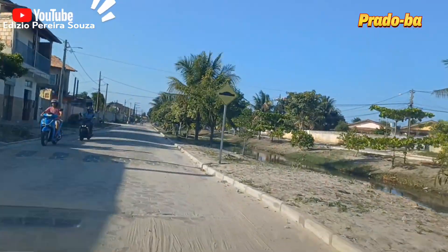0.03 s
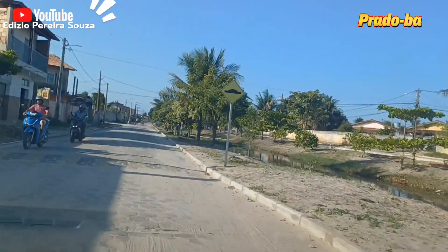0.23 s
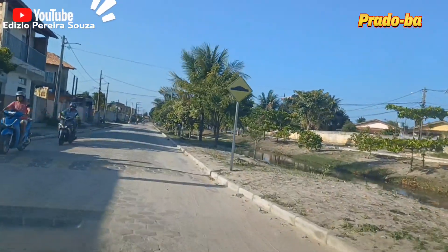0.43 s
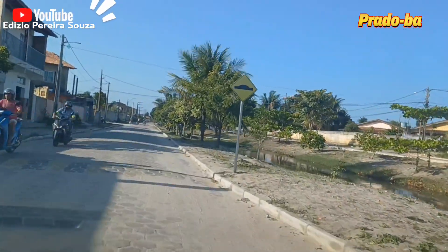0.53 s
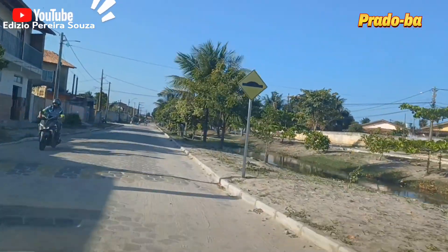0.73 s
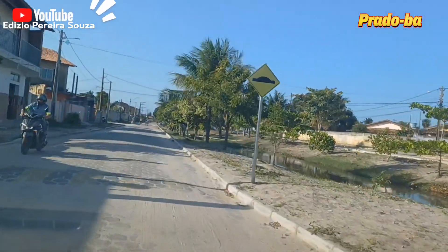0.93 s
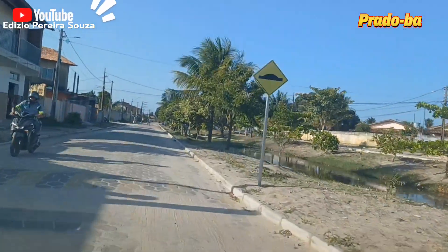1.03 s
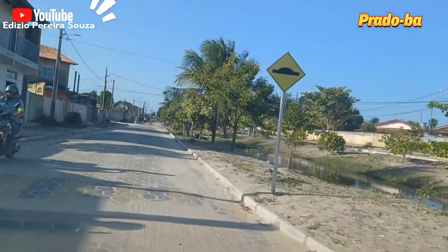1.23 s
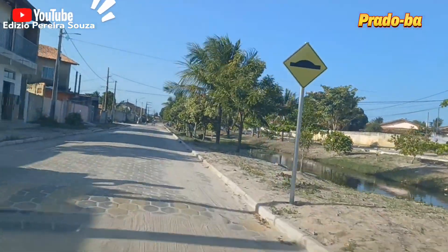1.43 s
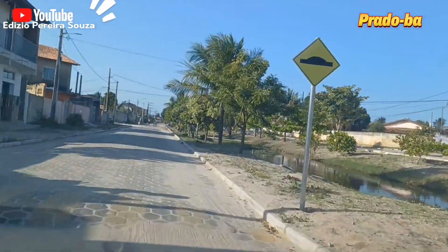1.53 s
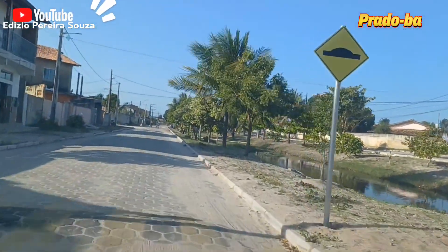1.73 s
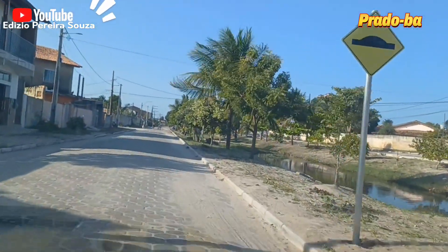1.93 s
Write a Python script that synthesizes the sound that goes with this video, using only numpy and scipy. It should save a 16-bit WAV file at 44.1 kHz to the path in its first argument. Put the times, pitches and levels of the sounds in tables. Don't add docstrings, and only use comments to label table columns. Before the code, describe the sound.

A car rolls over rough paving blocks, heard from inside as deep uneven rumbling and booming bumps.

```python
import sys
import numpy as np
from scipy import signal
from scipy.fft import rfft, irfft, next_fast_len
from scipy.io import wavfile
from scipy.ndimage import uniform_filter1d, map_coordinates

SR = 44100
rng = np.random.default_rng(int(sys.argv[2]) if len(sys.argv) > 2 else 0)


def waveform_to_disk(signal):
    frames = np.transpose(np.atleast_2d(signal))
    scaled = np.clip(frames, -1, 1) * 32767
    samples = np.round(scaled).astype(np.int16)
    wavfile.write(sys.argv[1], SR, samples)


def gain_from_db(level_db):
    decades = np.asarray(level_db, float) / 20
    return 10 ** decades


N = 88200

# start_s, roughness_db, tyre_roar_db
ROAD_SURFACE = [(0, -37, -50.5), (.17, -41, -49), (.42, -38, -50.5), (.68, -42, -52.5), (.78, -39.5, -49),
                (.93, -40.5, -54), (1.0, -36.5, -47), (1.2, -41.5, -52), (1.33, -35.5, -51),
                (1.42, -33, -52), (1.52, -35.5, -47.5), (1.57, -38, -57.5), (1.63, -37.5, -45),
                (1.7, -36, -51.5), (1.8, -40, -51.5), (2, -36.5, -50.5)]
# pitch_hz, width_hz, level_db
CABIN_MODES = [(34, 12.2, -3.5), (47.6, 12.3, -5), (76.6, 40, -7), (106.2, 20, -1.5), (137.1, 40.2, -2),
               (167.1, 57.6, -6.5)]
# pitch_hz, width_hz, level_db
FLOOR_MODES = [(181.4, 32.7, -1.5), (245, 29, 0.5), (282.4, 41, -3), (361.7, 70.4, -5), (429, 104, -8.5)]
# pitch_hz, level_db (per Hz)
TYRE_TONE = [(260, -34.5), (450, -8), (580, -1.5), (653, -4), (766, -5), (941, -13.5), (1780, -22.5),
             (2030, -28), (3000, -42.5), (3900, -72.5), (6600, -120)]
# start_s (the crest), pitch_hz, level_db (peak), left_lean (-1 to 1)
BUMPS = [(0.0125, 120.6, -17.5, -0.18), (.04, 68, -26, .08), (.08, 142, -24.5, .21),
         (0.087, 100.2, -20.5, -0.26), (0.168, 111.7, -21.5, 0.02), (0.223, 95.4, -22, -0.02),
         (0.223, 47, -19.5, -0.07), (.288, 123.4, -23.5, 0), (0.354, 82.5, -24, 0.12),
         (.372, 137, -23, -.07), (.384, 39.6, -27, -.06), (.408, 117.3, -24, -.31),
         (.432, 155.5, -26.5, .02), (.476, 144.7, -27, -.04), (0.496, 94.2, -21, -0.02),
         (0.566, 88, -21, 0.16), (0.569, 47.7, -20.5, -0.04), (.636, 51, -27, -.05),
         (.692, 46.7, -26.5, -.1), (.712, 84.4, -26.5, .14), (.788, 39, -25.5, -.06),
         (0.789, 86.8, -19.5, -0.02), (.836, 141.8, -25.5, .18), (.868, 72, -25.5, -.13),
         (0.951, 90, -21, -0.17), (0.981, 46.2, -20.8, -0.08), (1.028, 100.4, -26.5, -.06),
         (1.083, 53, -19, -0.06), (1.136, 85, -26.5, .08), (1.136, 123, -27.5, .12),
         (1.184, 47.4, -24.5, -.04), (1.219, 88.2, -24, 0.09), (1.28, 45.5, -25, -0.05),
         (1.287, 138.2, -22, 0.28), (1.356, 96.6, -21, -.24), (1.434, 164.4, -25.5, -0.3),
         (1.4335, 134.6, -17, 0.04), (1.454, 109.4, -16, -0.11), (1.495, 52.5, -20.5, -0.06),
         (1.551, 86.5, -18, 0.12), (1.608, 137.4, -26.5, .23), (1.632, 91.4, -22, .24),
         (1.681, 44.4, -24, -0.09), (1.716, 76, -24.5, 0), (1.724, 114, -26.5, -.09),
         (1.768, 60, -24.5, -.09), (1.8, 85.5, -24.5, 0.1), (1.852, 138.5, -26.5, .04),
         (1.975, 114.6, -23.5, -0.32)]
# start_s (the crest), pitch_hz, level_db (peak)
MORE_BUMPS = [(.012, 40, -36), (.013, 154.5, -26.5), (.013, 210, -35), (.13, 42, -30), (.65, 75.2, -34),
              (.73, 122, -26.5), (.85, 110.7, -30), (1.15, 81, -29.5), (1.25, 104.3, -26.5),
              (1.407, 109.5, -20), (1.27, 298, -40.5), (1.66, 150, -28.5), (1.85, 75.5, -26.5),
              (1.885, 101, -29.5), (1.991, 86, -26), (.112, 335, -42.5), (.132, 260, -37),
              (.164, 562, -51), (.184, 181.5, -34.5), (.184, 639, -54), (.264, 523, -48),
              (.316, 357, -43.5), (.372, 271, -39), (.404, 365, -43.5), (.44, 215, -33.5),
              (.548, 593, -51), (.632, 520, -53.5), (.7, 204, -37.5), (.736, 389, -46),
              (.768, 583, -52.5), (.808, 213, -37), (.824, 293, -44), (.956, 574, -47.5),
              (.976, 233.3, -40), (1.004, 346, -40.5), (1.068, 176, -34.5), (1.18, 663, -54.5),
              (1.36, 266, -35.5), (1.38, 363, -45.5), (1.42, 216, -31), (1.436, 482, -44.5),
              (1.44, 354, -42.5), (1.464, 275, -36), (1.504, 395, -43), (1.508, 576, -49.5),
              (1.512, 235, -31.5), (1.62, 277, -33.5), (1.632, 655, -50), (1.732, 311, -40.5),
              (1.732, 386, -38), (1.764, 235, -37.5), (1.828, 317, -41), (1.9, 247.5, -37),
              (1.94, 195, -36), (1.96, 304, -36.5), (1.984, 175, -32.5)]
# start_s, level_db (peak)
TRIM_RATTLES = [
    (.222, -58.5),
    (.745, -58),
    (1.046, -49.5),
    (1.103, -50),
    (1.172, -53.5),
    (1.612, -60),
]
# pitch_hz, width_hz, level_db
TRIM_MODES = [(1050, 120, -7), (1280, 120, -6), (1522, 80, -1), (1735, 110, -2), (2700, 600, -22),
              (4850, 150, -21)]
# start_s, pitch_hz, width_hz, level_db (peak)
SMALL_TICKS = [(.094, 12000, 3000, -55), (.398, 11500, 5960, -53), (.549, 11100, 3000, -57),
               (.81, 9000, 4000, -66), (.833, 8900, 4000, -63), (1.265, 6550, 595, -61),
               (1.449, 10600, 400, -68), (1.462, 13000, 6950, -49), (1.495, 10540, 2480, -52.5),
               (1.526, 2150, 150, -56.5), (1.532, 7200, 1506, -58.5), (1.686, 3780, 201, -52),
               (1.687, 4830, 397, -64.5), (1.79, 4700, 406, -57), (1.825, 4500, 600, -59.5),
               (1.885, 4000, 2500, -58), (1.615, 2500, 1500, -62), (1.72, 7540, 800, -62),
               (1.853, 9800, 1500, -53.5), (1.885, 12560, 1507, -54.5), (1.91, 11060, 1486, -51),
               (1.932, 14000, 2540, -51.5)]
# start_s, fine_rub_db, dull_scrape_db
STRAP_RUB = [(0.02, -68.5, -85.5), (0.08, -66.5, -75), (0.368, -71, -79), (0.396, -68, -78.5),
             (0.608, -68, -75), (0.756, -71.5, -84), (0.838, -68, -74.5), (0.898, -74.5, -81.5),
             (1.094, -71.5, -77), (1.406, -74, -80.5), (1.45, -69.5, -80), (1.466, -66, -74),
             (1.656, -71, -76.5), (1.69, -72, -69), (1.7, -75, -74.5), (1.772, -72, -69.5),
             (1.85, -65.5, -70), (1.9, -60.5, -66), (1.94, -61, -68), (1.965, -65.5, -70)]
# pitch_hz, level_db (per Hz)
FINE_TONE = [(3530, -34.5), (6000, -8), (7190, 1), (8580, -3), (11700, 1.5), (15100, -1.5), (15700, -2.5)]
# pitch_hz, level_db (per Hz)
DULL_TONE = [(1290, -30.5), (2200, -1), (2340, 1), (3040, -7.5), (3780, -4.5), (7000, -8), (9100, -43),
             (15400, -120)]
# pitch_hz, likeness (-1 to 1)
LEFT_RIGHT_LIKENESS = [(35, .96), (100, .68), (330, .8), (1410, -.15), (2500, .42), (7000, .4), (8200, .68),
                       (15000, .56)]
# pitch_hz, left_over_right_db
LEFT_RIGHT_BALANCE = [(40, -1), (120, 0), (300, 1), (1000, -1), (3000, -3), (5000, -3.5), (8000, -1),
                      (14000, 0)]


def wheel_knocks():
    joints_per_s, scatter_db = 110, 4
    draw = rng.random((2, 600, 3))
    at = (np.cumsum(0.5 + draw[..., 0], 1) / joints_per_s * SR).astype(int)
    strength = gain_from_db(scatter_db * 3.54 * (draw[..., 1] - 0.5))
    push = strength * np.sign(draw[..., 2] - 0.5)
    return np.array([np.bincount(a, p, N + SR)[:N + SR] for a, p in zip(at, push)])


def ringing(modes, low_hz, top_hz):
    def response(hz):
        dulling = (1 + 1j * hz / top_hz) ** 2
        bass_loss = (1j * hz / (low_hz + 1j * hz)) ** 2
        return resonances(modes)(hz) / dulling * bass_loss

    return unit(filtered(wheel_knocks(), response)[:, SR:])


def joints():
    rough_db, _ = curves(ROAD_SURFACE)
    cabin_db = -28 + 0.1 * (rough_db - rough_db.mean())
    cabin = gain_from_db(cabin_db) * ringing(CABIN_MODES, low_hz=21.3, top_hz=150)
    floor = gain_from_db(rough_db + 0.43) * ringing(FLOOR_MODES, low_hz=132, top_hz=363)
    return ports(cabin + floor)


def booms():
    rise_s, shortening, roundness = 0.048, 0.25, 5.03
    trim_db, lean_scatter, skew_rad = 1.45, 0.15, 0.21
    more_lean = lean_scatter * rng.standard_normal(len(MORE_BUMPS))
    bumps = np.r_[BUMPS, np.c_[MORE_BUMPS, more_lean]]
    start_s, pitch_hz, level_db, lean = bumps.T[..., None]
    t = np.arange(N) / SR - start_s
    progress = np.clip(t * (pitch_hz / 100) ** shortening / rise_s + 1, 0, 40)
    swell = gain_from_db(level_db + trim_db) * (progress * np.exp(1 - progress)) ** roundness
    skew = skew_rad * np.minimum(pitch_hz / 100, 2) * rng.standard_normal(start_s.shape)
    sides = []
    for side in (1, -1):
        tone = np.cos(2 * np.pi * pitch_hz * t + side * skew)
        sides.append((swell * (1 + side * lean) * tone).sum(0))
    return np.array(sides)


def puffs(events):
    out = np.zeros((2, N + SR))
    t = np.arange(SR // 5) / SR
    for start_s, modes, level_db, t60_s in events:
        noise = unit(filtered(rng.standard_normal((2, len(t))), resonances(modes)))
        envelope = gain_from_db(level_db - 60 * t / t60_s) * (1 - np.exp(-t / 0.0025))
        start = round(start_s * SR)
        out[:, start:start + len(t)] += envelope * noise
    return ports(out[:, :N])


def trim_rattles():
    return puffs([(s, TRIM_MODES, db, 0.16) for s, db in TRIM_RATTLES])


def ticks():
    return puffs([(s, [(hz, width, 0)], db, 0.056) for s, hz, width, db in SMALL_TICKS])


def strap_rustle():
    fine_db, dull_db = curves(STRAP_RUB)
    fine = gain_from_db(fine_db + 3.44 + 1.8 * wobble(45.4)) * rush(FINE_TONE, patchy_db=2.5)
    dull = gain_from_db(dull_db + 5.5 + 1.1 * wobble(45.5)) * rush(DULL_TONE, patchy_db=2.5)
    return ports(fine + dull)


def tyre_roar():
    _, roar_db = curves(ROAD_SURFACE)
    return ports(gain_from_db(roar_db + 0.8 * wobble(25)) * rush(TYRE_TONE, patchy_db=1.4))


def rush(tone, patchy_db):
    grains = signal.stft(rng.standard_normal((2, N)), nperseg=512)[2]
    patches = rng.standard_normal(grains.shape[1:])
    patches = uniform_filter1d(patches, size=8, axis=0)
    patches = uniform_filter1d(patches, size=6, axis=1)
    pair = signal.istft(grains * gain_from_db(patchy_db * unit(patches)), nperseg=512)[1][:, :N]
    return unit(filtered(pair, lambda hz: gain_from_db(along(tone, hz))))


def ports(pair):
    def blend(hz):
        angle = np.arccos(np.clip(along(LEFT_RIGHT_LIKENESS, hz), -1, 1)) / 2
        return np.array([np.cos(angle), np.sin(angle)])

    def balance(hz):
        return gain_from_db(np.outer([0.5, -0.5], along(LEFT_RIGHT_BALANCE, hz)))

    mid, side = filtered(pair, blend)
    return filtered(np.array([mid + side, mid - side]), balance)


def resonances(modes):
    def response(f):
        total = 0
        for k, (hz, width, db) in enumerate(modes):
            total = total + (-1) ** k * gain_from_db(db) * 1j * f * width / (hz * hz - f * f + 1j * f * width)
        return total

    return response


def filtered(x, response):
    size = next_fast_len(x.shape[-1] + SR // 2)
    shaped = rfft(x, size) * response(np.fft.rfftfreq(size, 1 / SR))
    return irfft(shaped, size)[..., :x.shape[-1]]


def unit(x):
    return x / np.sqrt(np.mean(x ** 2) + 1e-20)


def along(points, hz):
    f, value = np.transpose(points)
    return np.interp(np.log(hz + 1), np.log(f + 1), value)


def curves(rows):
    start_s, *columns = np.transpose(rows)
    return [np.interp(np.arange(N) / SR, start_s, column) for column in columns]


def wobble(rate):
    knots = rng.standard_normal(int(N * rate / SR) + 4)
    return map_coordinates(knots, [np.arange(N) * rate / SR])


def scene():
    return joints() + booms() + trim_rattles() + ticks() + strap_rustle() + tyre_roar()


def roll_off(x):
    return signal.sosfilt(signal.butter(12, 15810, fs=SR, output="sos"), x)


def record(dry):
    return roll_off(dry)


dry = scene()
out = record(dry)
waveform_to_disk(out)
```